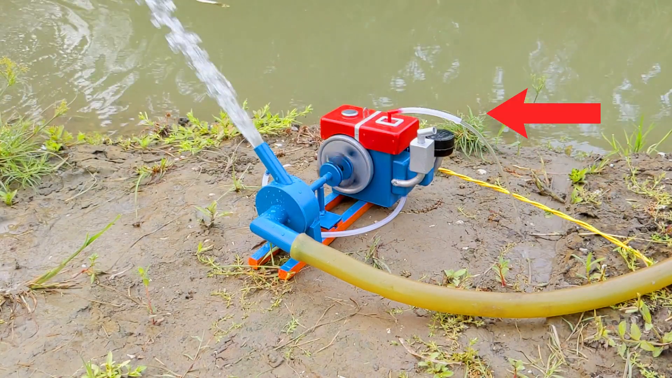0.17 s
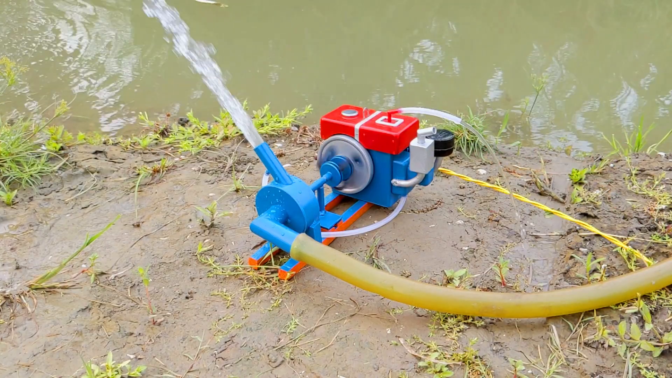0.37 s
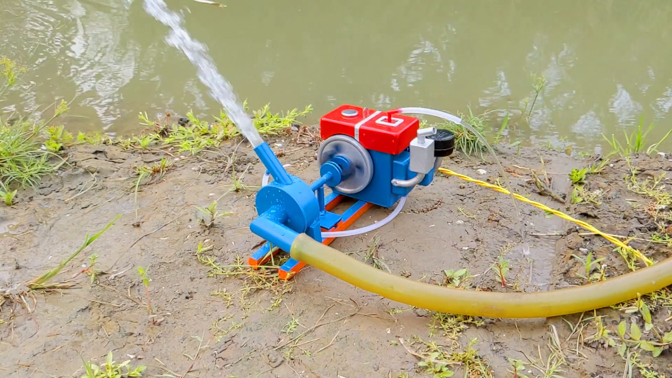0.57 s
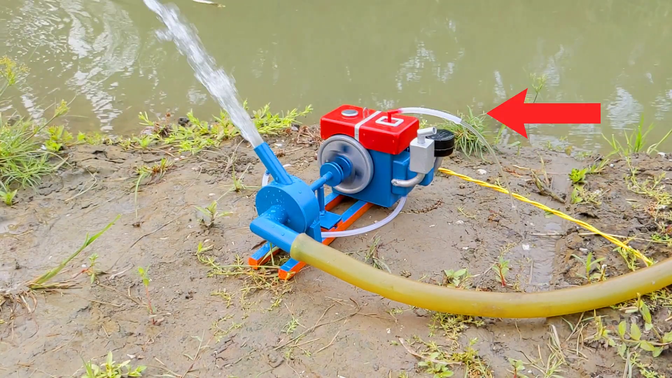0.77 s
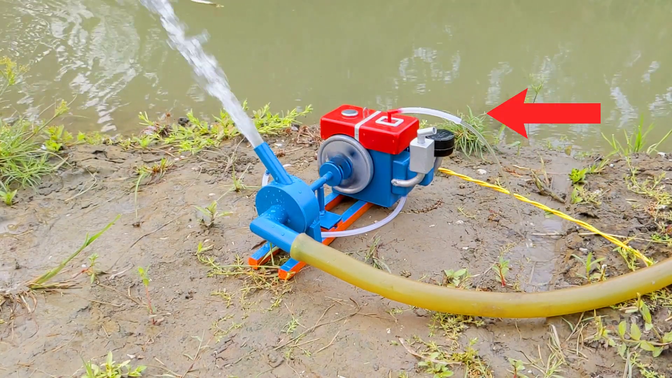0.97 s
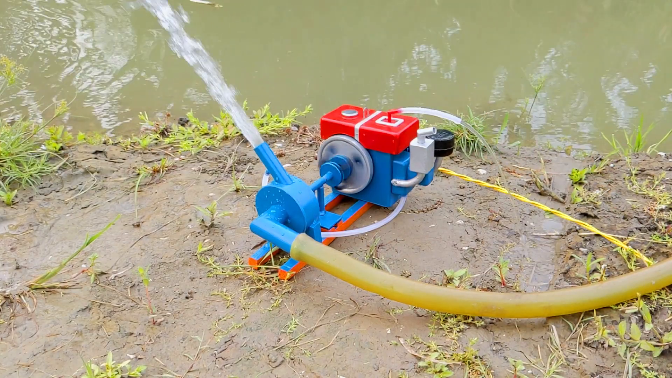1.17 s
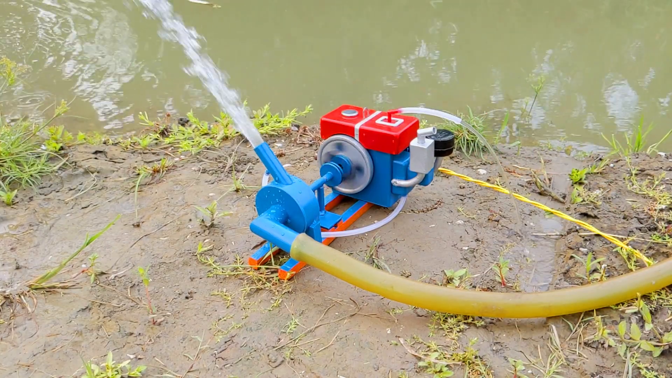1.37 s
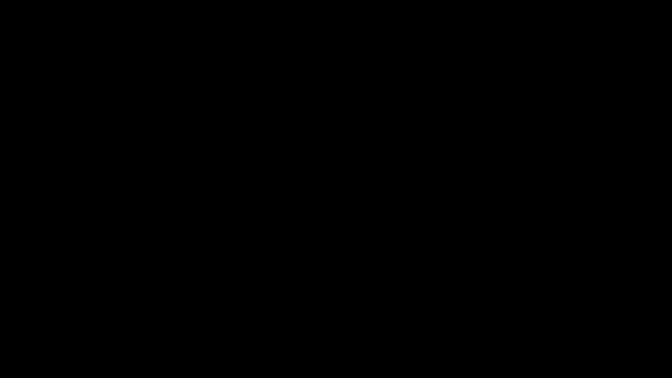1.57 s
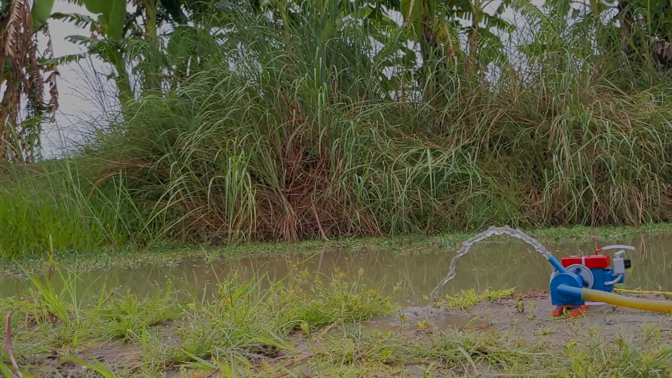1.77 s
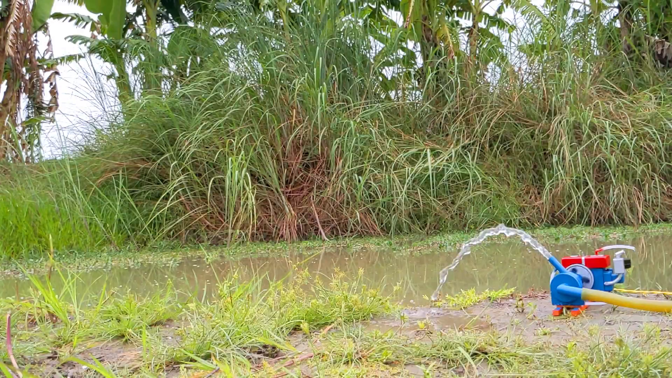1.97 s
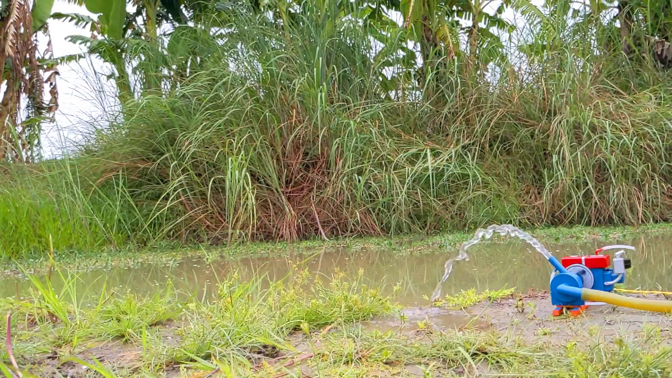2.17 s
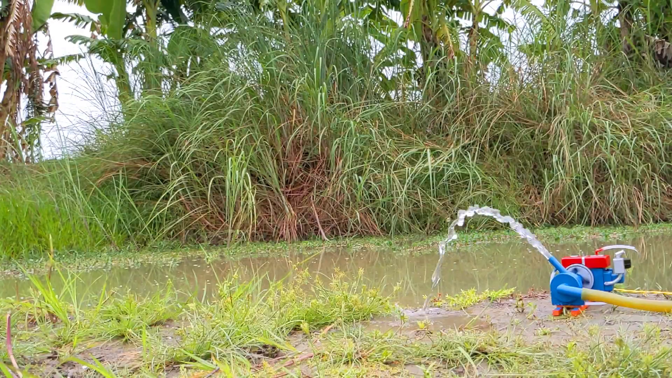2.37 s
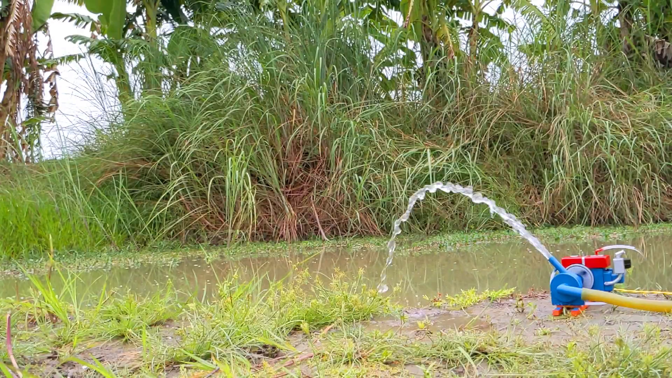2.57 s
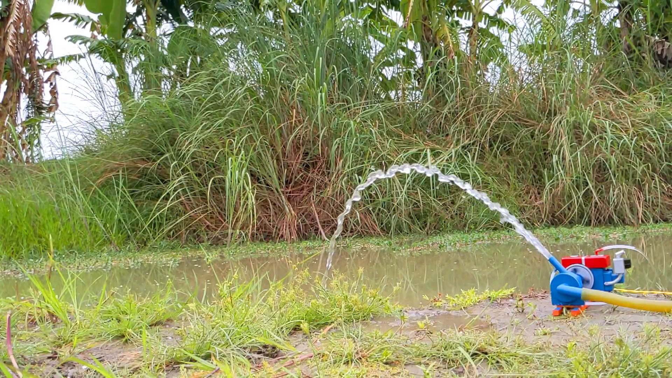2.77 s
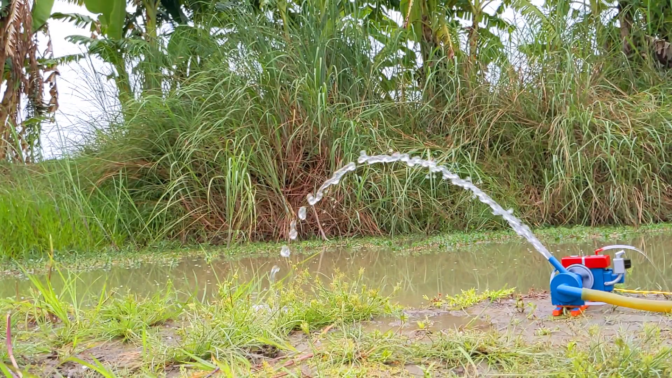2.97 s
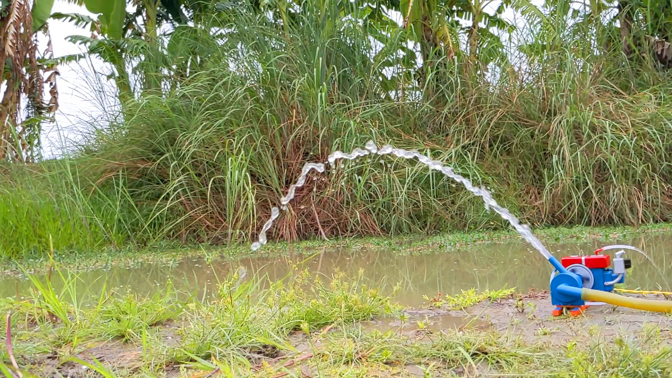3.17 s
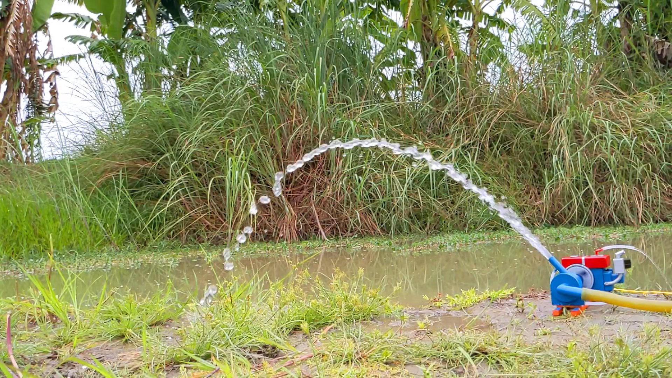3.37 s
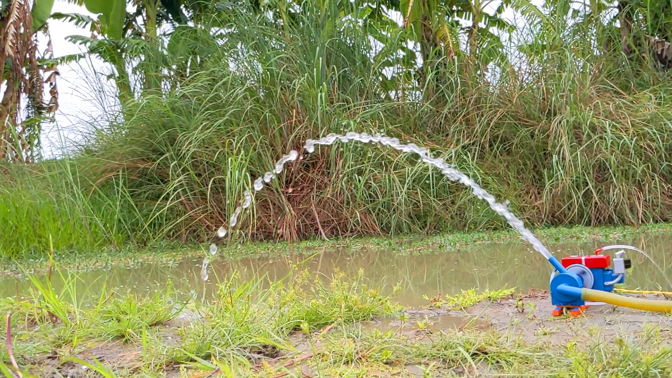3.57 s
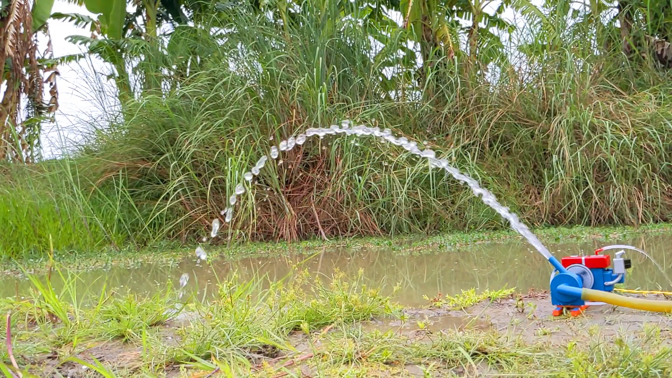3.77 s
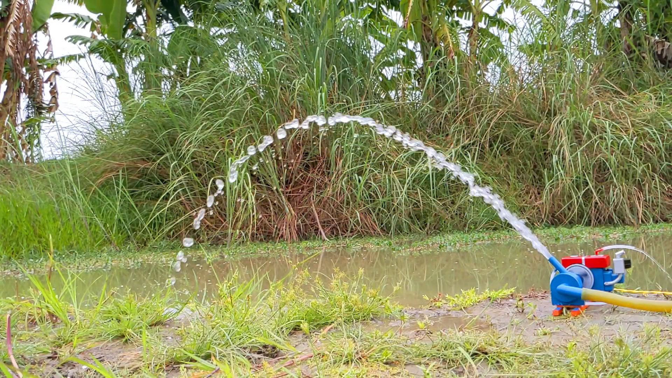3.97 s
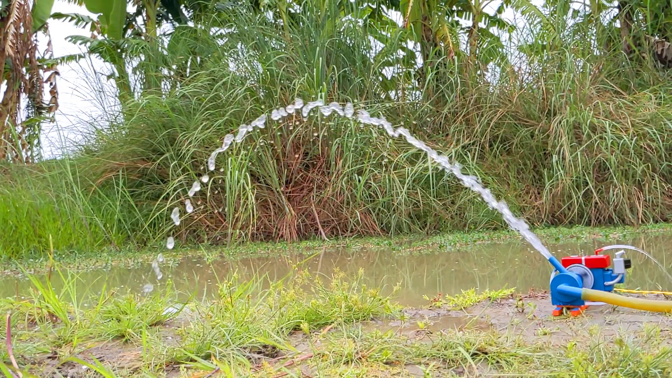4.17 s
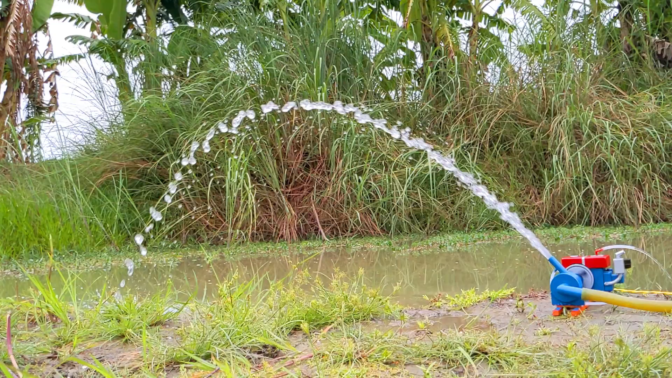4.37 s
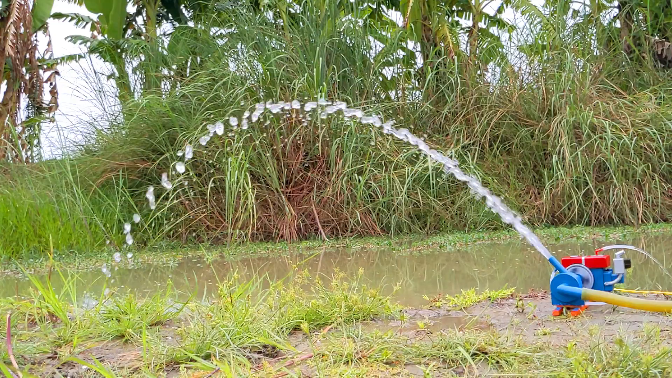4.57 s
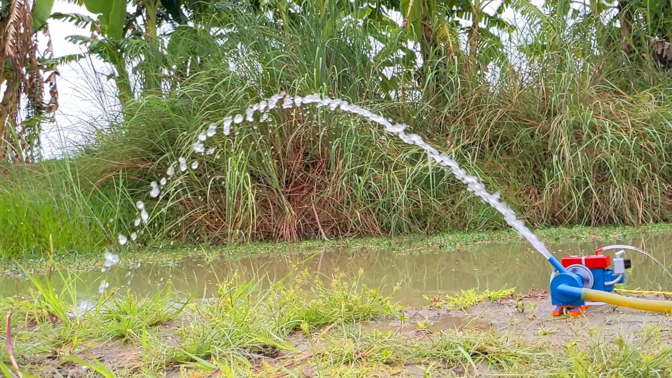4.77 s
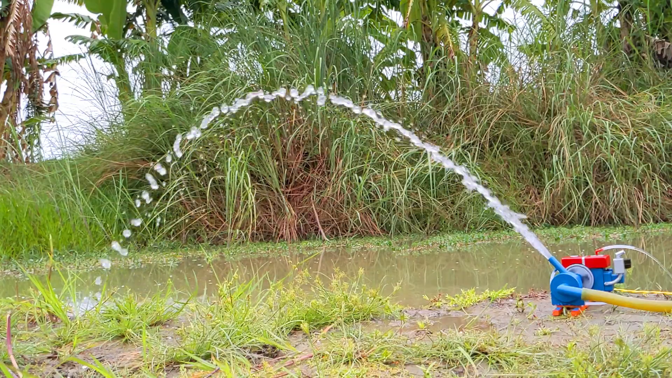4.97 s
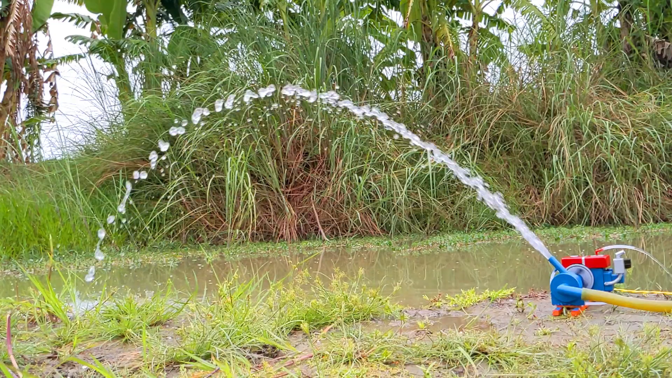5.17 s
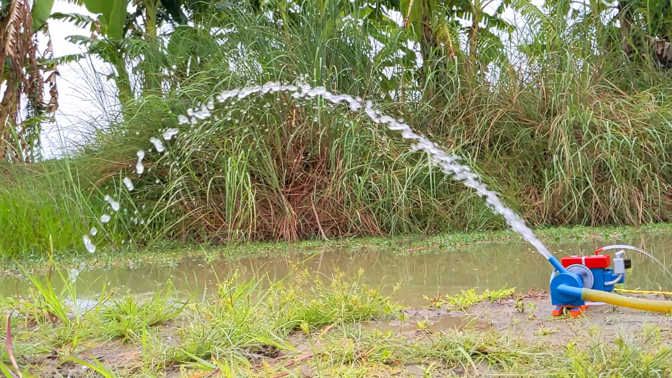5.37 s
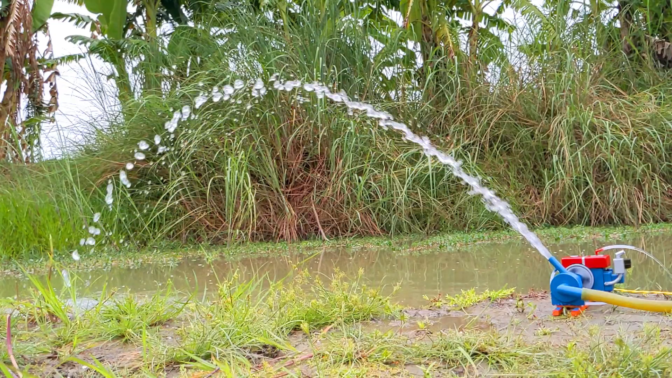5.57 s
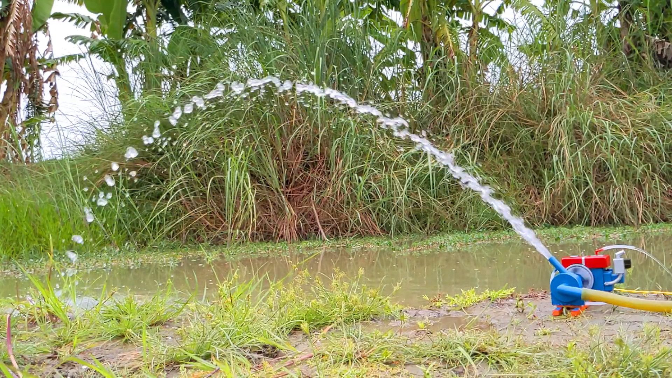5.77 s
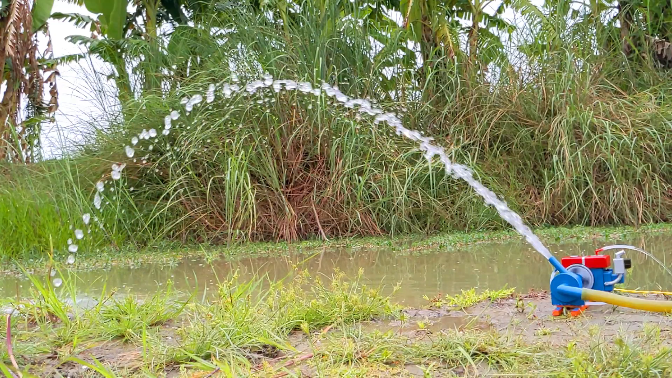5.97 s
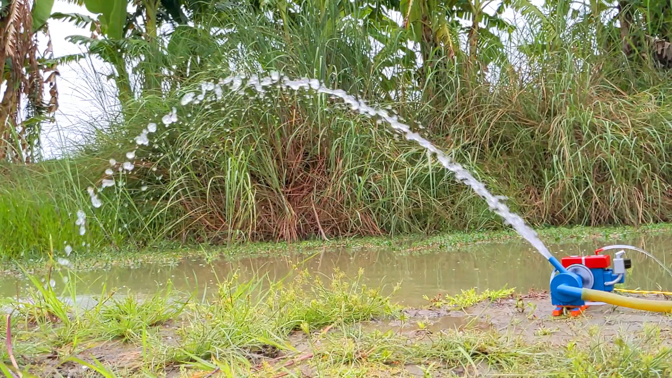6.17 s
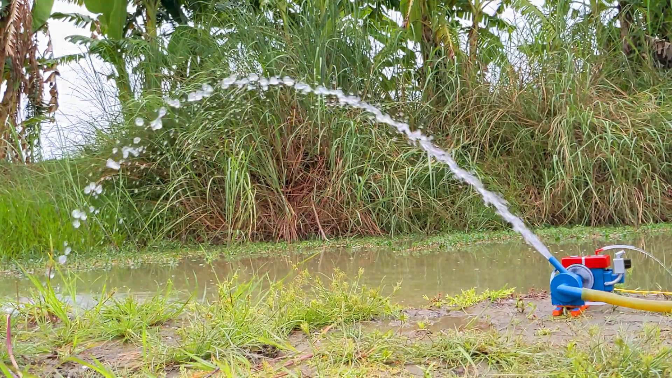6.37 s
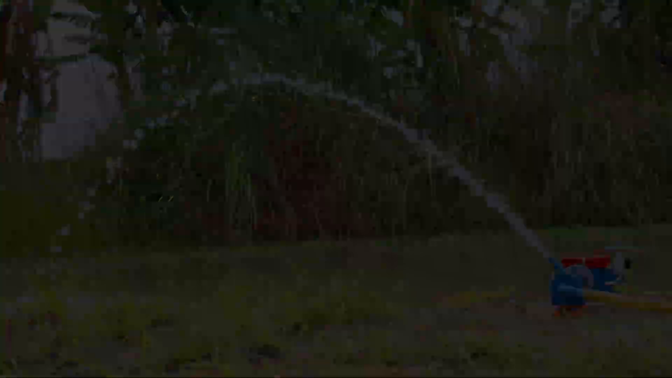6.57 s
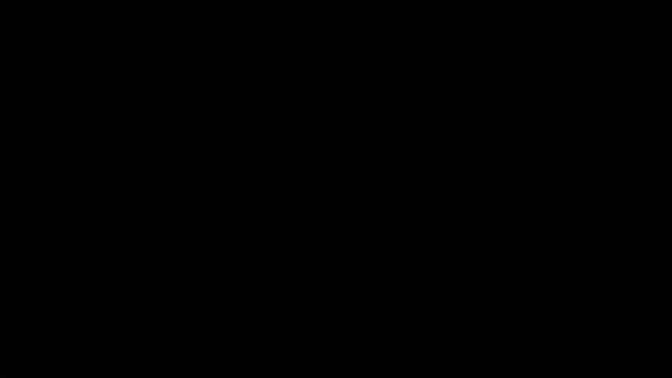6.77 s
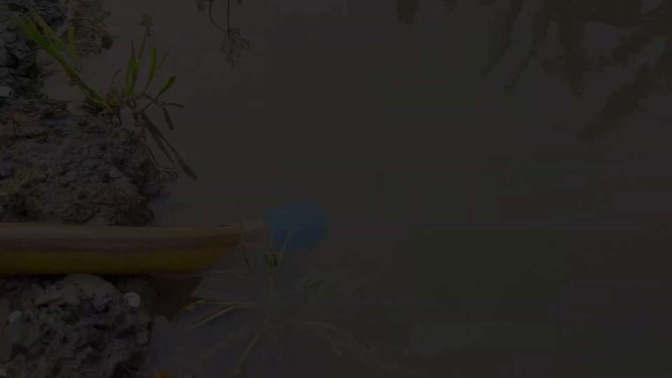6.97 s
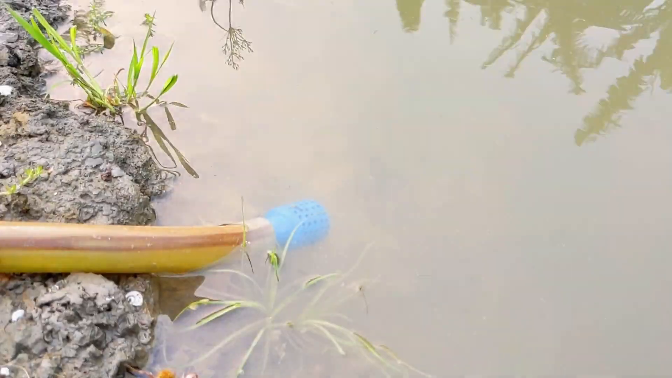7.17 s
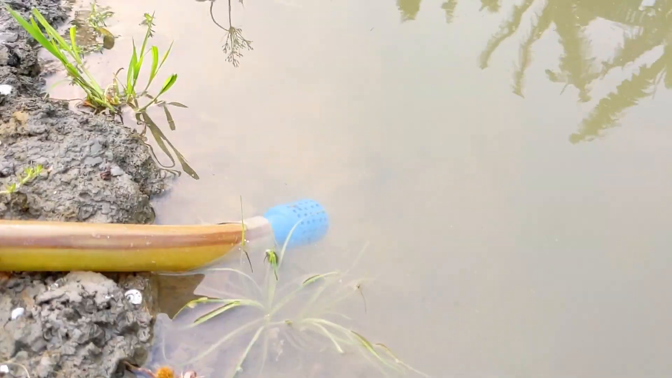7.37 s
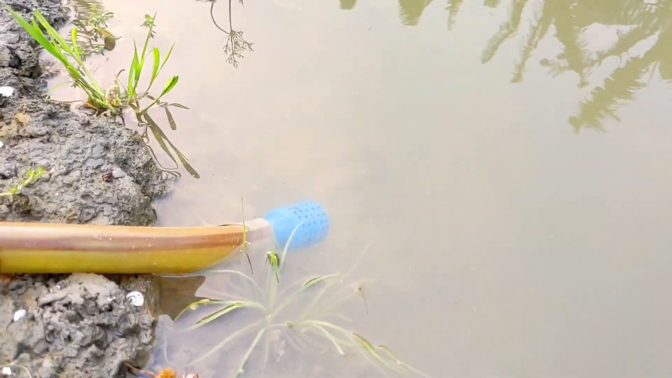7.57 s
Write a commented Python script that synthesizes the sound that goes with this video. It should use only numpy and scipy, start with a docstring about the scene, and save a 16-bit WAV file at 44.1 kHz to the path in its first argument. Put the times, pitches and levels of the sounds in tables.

```python
"""A toy pump beside a pond, heard from three places in turn that fade into one another.
Close by, shaft knocks and clacks ring modes of the plastic casing, with a hum and a thin whistle of sines.
Flickering noise bands make the jet's spray, low noise the wind and open air; hiss bursts make bright
pump clacks and, later, the jet's splats. Further off, the pump starts and spins up; short gliding tones
make pops, most of them drips, and later hollow plops. At the intake it runs steadily amid puffs of wind."""
import sys
import numpy as np
from scipy import signal
from scipy.io import wavfile
from scipy.ndimage import uniform_filter1d

SR = 44100
rng = np.random.default_rng(int(sys.argv[2]) if len(sys.argv) > 2 else 0)


def int16_out(signal):
    """Quantize to a 16-bit WAV file."""
    q = np.round(np.clip(np.atleast_2d(signal).T, -1, 1) * 32767)
    wavfile.write(sys.argv[1], SR, q.astype(np.int16))


N = 336042
TIME = np.arange(N) / SR
SIDES = np.array([[1], [-1]])  # left, right
# fade-in start, fade-in end, fade-out start, fade-out end, all in seconds
CLOSE_FADE = (-1, -.5, 1.51, 1.85)
FAR_FADE = (1.6, 1.9, 6.5, 7.2)
INTAKE_FADE = (6.72, 7.07, 8, 9)


def undb(db):
    """dB to gain."""
    return 10 ** (np.asarray(db) / 20)


def unit(x):
    """Scale to rms 1."""
    return x / np.sqrt(np.mean(x ** 2))


def pan(left_minus_right_db):
    """Left and right gains that split a level difference evenly."""
    return undb(left_minus_right_db * SIDES / 2)


def band(x, lo_hz, hi_hz, order=2):
    """Band-pass."""
    sos = signal.butter(order, [lo_hz, min(hi_hz, .45 * SR)], "band", fs=SR, output="sos")
    return signal.sosfilt(sos, x)


def walk(rate):
    """Random levels held 1 / rate s and slewed; spread near 1."""
    hold = int(SR / rate)
    steps = np.repeat(rng.standard_normal(N // hold + 1), hold)
    return 1.52 * uniform_filter1d(uniform_filter1d(steps, hold), hold)[:N]


def fade(times):
    """Gain of a place that fades in and out."""
    return np.interp(TIME, times, [0, 1, 1, 0]) ** 0.98


def mixed(levels_db):
    """One gain from the levels close, far and at the intake, summed as powers."""
    places = zip((CLOSE_FADE, FAR_FADE, INTAKE_FADE), levels_db)
    return np.sqrt(sum((fade(times) * undb(db)) ** 2 for times, db in places))


def clicks(times, sizes):
    """Impulses at exact times, each shared between two samples."""
    out, place = np.zeros(N + 1), np.clip(times * SR, 0, N - 1)
    whole = place.astype(int)
    np.add.at(out, whole, sizes * (1 - place + whole))
    np.add.at(out, whole + 1, sizes * (place - whole))
    return out[:N]


def add(out, start_s, sound):
    """Mix a short stereo sound in at a time."""
    i = int(start_s * SR)
    out[:, i:i + sound.shape[1]] += sound[:, :N - i]


def small(start_s, end_s, db, scatter_db, lo_hz, hi_hz, count):
    """Random rows of start in seconds, peak level in dB, frequency in Hz."""
    u = rng.random((count, 3))
    starts = start_s + (end_s - start_s) * u[:, 0]
    levels = db + scatter_db * (2 * u[:, 1] - 1)
    return list(zip(starts, levels, lo_hz * (hi_hz / lo_hz) ** u[:, 2]))


def bubble(t, hz, cycles, glide, order=1):
    """A rising tone whose envelope swells to 1 and dies within a few cycles."""
    u = t * hz / cycles
    return (u * np.exp(1 - u)) ** order * np.sin(2 * np.pi * hz * t * (1 + glide * t))


def blows(speed, rates, db, angles, strengths, scatter_db, jitter_ms, lag_ms):
    """Clicks at set angles of every shaft turn, uneven in size and time; the left is shifted by the lag."""
    running = TIME >= speed[0][0]
    # the small ramp keeps the turn count rising while the shaft rests
    turns = np.cumsum(np.interp(TIME, *np.transpose(speed)) * running) / SR + TIME / N
    whole = np.arange(int(np.interp(speed[-1][0] + .2, TIME, turns)))
    rate = np.interp(np.interp(whole + .5, turns, TIME), *np.transpose(speed))
    angles, strengths = np.array(angles).T, np.array(strengths).T
    at = np.interp([whole + np.interp(rate, angles[0], a) for a in angles[1:]], turns, TIME)
    share = undb([np.interp(rate, strengths[0], c) for c in strengths[1:]])
    # the blows of one turn share the power of that moment
    share = share / np.sqrt(np.sum(share ** 2, 0) * rate / SR)
    chance = rng.standard_normal((2, *at.shape))
    size = share * undb(np.interp(rate, rates, db) + scatter_db * chance[0])
    # the shaft also slips a little as a whole from turn to turn
    times = at + jitter_ms * (chance[1] + chance[1, 0]) / 1000
    return np.array([clicks(times + lag_ms / 1000, size), clicks(times, size)])


def rattled(hits, share, fade_s, wide):
    """Part of each blow's power turns into a few ms of chatter from loose parts, unlike on the two sides."""
    keep = np.exp(-1 / (fade_s * SR))
    noise = unit(rng.standard_normal(N) + wide * rng.standard_normal((2, N)))
    tail = signal.lfilter([np.sqrt(1 - keep ** 2)], [1, -keep], hits)
    return np.sqrt(1 - share) * hits + np.sqrt(share) * noise * tail


def ring(x, modes, place):
    """Decaying modes that start together; a unit click comes out with unit energy."""
    t = np.arange(SR // 8) / SR
    shape = 0
    for mode in modes:
        hz, t60_s, gain = mode[0], mode[1], undb(mode[2 + place])
        shape = shape + gain * np.exp(-np.log(1000) * t / t60_s) * np.sin(2 * np.pi * hz * t)
    return signal.oaconvolve(x, -shape[None] / np.sqrt(np.sum(shape ** 2)), axes=1)[:, :N]


# Casing modes, dull ones for the knocks and bright ones for the clacks.
# Each row: frequency in Hz, 60 dB decay time in seconds, relative level in dB close, far and at the intake.
BOOM_MODES = [(438, 0.035, -34, -15, -6), (545.3, 0.065, -42, -8, -1), (617, 0.041, -48, -17, -20),
              (769, 0.059, -3.5, -7, -13), (800.7, 0.068, 3.5, 3, -3), (840.5, 0.036, 1.5, 6.5, 12.5),
              (945, 0.0083, -36, -0.5, 15)]
CLACK_MODES = [(1233, 0.03, -12, 5, -29), (1590, 0.0082, -29, 14.5, -41), (2113, 0.0058, -3, 14, 15.5),
               (2654, 0.015, -44, 6.5, -25), (3647, 0.0046, 13.5, -32, -32), (4650, 0.0035, 9, -2, 0),
               (6040, 0.0028, 3.5, 7, 3.5), (7970, 0.0024, -7, -31, 6), (12500, 0.001, 3, -3, -20)]
REBOUND_MS, REBOUND_DB = 1.193, -4  # each clack bounces once


def pump(speed, level, knocks, clacks, place, scatter_db, jitter_ms, rattle, boom_lag_ms, clack_lag_ms):
    """Dull knocks boom in the casing; sharp clacks bounce once and ring its small parts."""
    rates, boom_db, clack_db = np.transpose(level)
    boom = blows(speed, rates, boom_db, *knocks, scatter_db, jitter_ms, boom_lag_ms)
    boom = rattled(boom, rattle, fade_s=.005, wide=.5)
    # clacks vary more in level and have a timing scatter of their own
    clack = blows(speed, rates, clack_db, *clacks, scatter_db + 1.2, .04, clack_lag_ms)
    clack = clack + undb(REBOUND_DB) * np.roll(clack, int(REBOUND_MS * SR / 1000), axis=1)
    clack = rattled(clack, .15, fade_s=.002, wide=.7)
    # so small a casing sends out no bass
    boom = band(ring(boom, BOOM_MODES, place), 490, 1180)
    return boom + band(ring(clack, CLACK_MODES, place), 1000, 18000)


# Close shaft speed. Each row: time in seconds, turns per second.
CLOSE_SPEED = [(0, 34.57), (1.8, 34.57)]
# Close loudness. Each row: shaft speed in turns per second, boom level in dB, clack level in dB.
CLOSE_LEVEL = [(34.57, -29.5, -37)]
# Where knocks and clacks fall. Each row: turns per second, then an angle in turns for each blow.
CLOSE_KNOCK_ANGLES = [(34.57, .414, .58, .599, .716, .829)]
CLOSE_CLACK_ANGLES = [(34.57, .435, .61, .76)]
# How hard they strike. Each row: turns per second, then a relative strength in dB for each blow.
CLOSE_KNOCKS = [(34.57, -16.5, -0.091, -0.2, -4, 2.5)]
CLOSE_CLACKS = [(34.57, -5.5, 0, -0.5)]


def close_pump():
    """The nearby shaft turns steadily and strikes the casing several times a turn."""
    return pump(CLOSE_SPEED, CLOSE_LEVEL, (CLOSE_KNOCK_ANGLES, CLOSE_KNOCKS),
                (CLOSE_CLACK_ANGLES, CLOSE_CLACKS), place=0,
                scatter_db=.6, jitter_ms=.02, rattle=.03, boom_lag_ms=-.06, clack_lag_ms=.1)


WHISTLE_HZ, WHISTLE_DB = 5157, -14  # level against the close clack


def whistle():
    """A thin high sine that wavers in level and slightly in pitch."""
    db = CLOSE_LEVEL[0][2] + WHISTLE_DB + 1.6 * walk(14)
    return undb(db) * np.sin(2 * np.pi * np.cumsum(WHISTLE_HZ + 1.5 * walk(20)) / SR)


# Motor hum close and at the intake. Each row: multiple of the shaft speed, rms level in dB.
CLOSE_HUM = [(7, -58), (11, -54), (12, -62), (13, -61), (14, -62), (16, -51), (17, -54), (18, -54)]
INTAKE_HUM = [(7.3, -54.5), (9, -51), (12, -48), (13, -55)]


def hum(orders, speed):
    """Low motor tones at fixed multiples of a steady shaft speed that waver a little in level."""
    out = 0
    for order, db in orders:
        gain = np.sqrt(2) * undb(db + 0.44 * walk(15))
        out = out + gain * np.sin(2 * np.pi * (order * speed[0][1] * TIME + rng.random()))
    return out


BURST_LAG_S = .0002  # the left side hears droplets and hiss bursts a little late
BURST_PAN_DB = -6.5  # left minus right, for both


def droplets(count):
    """Tiny bubbles of a few cycles, each on its own pitch."""
    out, t = np.zeros((2, N)), np.arange(SR // 100) / SR
    lagged = np.maximum(t - np.array([[BURST_LAG_S], [0]]), 0)
    lo_hz, hi_hz = 1600, 6000
    for when, strength, pitch, side in rng.random((count, 4)):
        # the weakest lie near 2 dB before the patter depth and spray level scale them
        size = undb(2 - 3.4 * np.log(strength + 0.066)) * pan(BURST_PAN_DB + 8 * (side - .5))
        add(out, when * N / SR, size * bubble(lagged, lo_hz * (hi_hz / lo_hz) ** pitch, 2.2, glide=21.4))
    return out


def patter():
    """Many small drops as short decaying pulses that land left and right."""
    when, strength, side = rng.random((2400, 3)).T
    size = undb(-5.3 * np.log(strength + .008))
    decay = np.exp(-1 / (.0015 * SR))
    bursts = np.array([clicks(when * N / SR, size * w) for w in (np.sqrt(side), np.sqrt(1 - side))])
    return unit(signal.lfilter([1], [1, -decay], bursts))


# Colour of the spray. Each row: frequency in Hz, relative level in dB per Hz.
SPRAY_COLOUR = [(150, -22), (260, -22), (450, -31), (620, -28), (800, -15), (1300, -32), (2000, -28.5),
                (3200, -29.5), (4840, -37), (8000, -38.5), (15500, -53)]
SPRAY_DB = (-44, -43.5, -43)  # close, far at full speed, at the intake
SPRAY_DB_PER_TURN_S = 1.02  # the far jet grows with shaft speed
SPRAY_DULL_DB = 0.06  # treble lost per octave above 4 kHz for each turn per second below full speed
PATTER_DB = (-1, 3, -1)  # depth of the patter close, far and at the intake
TREBLE_PAN_DB = -4  # left minus right; the right microphone hears more of the spray's top


def water():
    """Spray as half-octave noise bands that flicker, pricked by the patter and ringing droplets."""
    slower = FAR_SPEED[-1][1] - np.interp(TIME, *np.transpose(FAR_SPEED))
    gain = mixed((SPRAY_DB[0], SPRAY_DB[1] - SPRAY_DB_PER_TURN_S * slower, SPRAY_DB[2]))
    depth = mixed(PATTER_DB) / mixed((0, 0, 0))
    drops = patter()
    colour_hz, colour_db = np.transpose(SPRAY_COLOUR)
    out, swell = 0, walk(11)
    for hz in 150 * 2 ** np.arange(0, 7, .5):
        db = np.interp(np.log(hz), np.log(colour_hz), colour_db) + 1.5 * swell + 1.6 * walk(12)
        db = db - SPRAY_DULL_DB * max(np.log2(hz / 4000), 0) * slower * fade(FAR_FADE)
        mid, side = rng.standard_normal((2, N))
        # low sound is nearly alike at both microphones; drops show mostly in the treble
        wide = min(hz / 1300., 1.05)
        # each band has drops of its own besides those that sound in all
        pricks = .45 * drops + .75 * np.roll(drops, rng.integers(N), axis=1)
        noise = (mid + wide * side * SIDES) * (1 + wide ** 2 * depth * pricks)
        treble_pan = pan(TREBLE_PAN_DB * np.exp(-np.log2(hz / 9600) ** 2 * 4))
        out = out + undb(db) * treble_pan * band(noise, hz * 2 ** -.25, hz * 2 ** 0.24)
    # bring the treble to rms 1, then lean the whole spray to the right
    out = out / np.sqrt(np.mean(band(out, 4500, 14000) ** 2)) * pan(-3)
    return (out + depth * droplets(count=2200)) * gain


# Puffs of wind on the ports.
# Each row: middle in seconds, level in dB, half length in seconds (to 1/e), left minus right in dB.
GUSTS = [(0.01, -50, 0.021, -18), (.17, -60, 0.093, -6), (0.833, -50, 0.022, 18), (0.957, -42, 0.075, -1),
         (1.106, -49, 0.035, 18), (1.225, -51, 0.042, -9), (6.894, -52, 0.052, 6),
         (7.037, -40.5, 0.055, 13), (7.207, -54, 0.092, 20), (7.36, -53.5, 0.07, 25),
         (7.51, -53, 0.043, 14)]
BREEZE_DB = (-57.5, -51, -56.5)  # steady rumble close, far and at the intake
BREEZE_ALIKE = .75  # likeness of the two sides, 0-1


def wind():
    """Low rumble of air on the microphone ports: a steady breeze and short puffs, many to one side."""
    rumbles = []
    for noise in rng.standard_normal((4, N)):
        rumbles.append(unit(band(noise, 48.0, 109.4, order=3) + undb(-10.0) * band(noise, 119, 304)))
    mid, side, puff_mid, puff_side = rumbles
    breeze = np.sqrt(1 + BREEZE_ALIKE) * mid + np.sqrt(1 - BREEZE_ALIKE) * side * SIDES
    gusts = 0
    for middle_s, db, half_s, pan_db in GUSTS:
        gusts = gusts + undb(db) * pan(pan_db) * np.exp(-((TIME - middle_s) / half_s) ** 2)
    return breeze * mixed(BREEZE_DB) + gusts * unit(puff_mid + .8 * SIDES * puff_side)


def air():
    """A soft wide bed of outdoor noise, partly alike on both sides, that wavers slowly."""
    noise = rng.standard_normal(N) + 0.3 * rng.standard_normal((2, N))
    return unit(band(noise, 150, 1460, order=1)) * undb(-54.5 + 1.4 * walk(2.82))


# Short bursts of hiss: clacks of the pump early on, then splats of water.
# Each row: start in seconds, peak of the hiss in dB before crack and pan, brightness in Hz.
HISS_BURSTS = [(.0747, -39, 8060), (0.1375, -28, 7800), (.2648, -32, 8000), (.3102, -28.5, 8000),
               (.3326, -28, 8000), (.3681, -31, 8000), (.5636, -33, 12000), (.583, -33, 9000),
               (.600, -24, 5200), (.633, -35, 9500), (.6938, -34, 7400), (0.766, -31, 8000),
               (.8175, -27.5, 8000), (.8525, -33, 8000), (.9148, -28, 8050), (.9622, -29, 8000),
               (1.058, -26.5, 7960), (1.385, -22, 3000), (1.832, -39, 5500), (1.947, -39, 4500),
               (2.011, -33, 2000), (2.02, -27, 2530), (2.0324, -32, 4100), (2.18, -30, 2680),
               (2.255, -38, 8000), (2.325, -28.5, 5530), (2.369, -29, 6050), (2.479, -20.5, 3330),
               (2.563, -27.5, 5200), (2.628, -33.5, 5340), (2.658, -32, 4220), (2.607, -28, 2090),
               (2.687, -22.5, 2300), (2.740, -26, 1800), (2.755, -28, 2300), (3.039, -30, 1500),
               (3.059, -26, 1300), (3.087, -26, 2200), (3.13, -31, 1700), (3.15, -22, 2660),
               (3.183, -33, 6000), (3.200, -34, 5900), (3.210, -25, 2100), (3.2324, -20, 2740),
               (3.4263, -22.5, 1520), (3.576, -22, 2980), (3.631, -28, 6200), (3.688, -24, 1150),
               (3.719, -18.5, 1960), (3.727, -28, 2400), (3.747, -24, 5300), (3.8746, -29, 5010),
               (4.16, -28, 4940), (4.248, -25, 1530), (4.2788, -25, 5170), (4.34, -25.5, 5600),
               (4.411, -23, 4550), (4.463, -30, 4810), (4.5356, -26, 3150), (4.565, -22.5, 5600),
               (4.8464, -27, 4500), (4.861, -27.5, 5500), (4.942, -27, 5500), (4.993, -34, 6000),
               (5.069, -23, 4280), (5.1362, -29, 5000), (5.153, -20.5, 2490), (5.2463, -26.5, 3380),
               (5.554, -31, 3030), (5.6311, -40, 4720), (5.6594, -21, 3070), (5.7595, -22, 3310),
               (5.8226, -19, 3500), (5.8766, -23.5, 3370), (5.911, -28, 3920), (5.995, -28, 3600),
               (6.0442, -39, 4400), (6.215, -27.5, 7950), (6.2789, -14.5, 4570), (6.337, -24, 4460),
               (6.3836, -26, 3780), (6.424, -21.5, 3280), (6.4496, -26, 2220), (6.4937, -32, 3280),
               (6.541, -21.5, 3660), (6.6203, -28, 4700), (6.655, -20, 3250), (6.728, -18.5, 3300),
               (7.1936, -30, 4500), (7.235, -25.5, 6540), (7.432, -23, 4540), (7.48, -29, 5000),
               (7.5478, -27, 5840)]
CRACK_DB, FIZZ_DB = -14, -8  # bright edge against the hiss peak; fizz after it against the edge


def hiss_bursts():
    """Short bursts of hiss with a bright crack and fizz: pump clacks, then water splats."""
    out, t = np.zeros((2, N)), np.arange(SR // 20) / SR
    small_splats = small(3.4, 6.75, db=-29.5, scatter_db=4, lo_hz=1200, hi_hz=4500, count=70)
    for start_s, db, hz in HISS_BURSTS + small_splats:
        noise = rng.standard_normal(len(t)) + .5 * rng.standard_normal((2, len(t)))
        hiss = band(noise, hz * .8, hz * 1.3)
        hiss[0] = np.roll(hiss[0], int(BURST_LAG_S * SR))
        burst = hiss * np.exp(-t / 0.0046) * np.minimum(t / 0.00043, 1)
        edge = np.exp(-t / 0.00026) + undb(FIZZ_DB) * np.exp(-t / 0.0053)
        crack = undb(CRACK_DB) * unit(band(noise, 4500, 12000, order=1)) * edge
        add(out, start_s, undb(db) * pan(BURST_PAN_DB) * (burst / np.abs(burst).max() + crack))
    return out


# Single short pops. Each row: start in seconds, peak level in dB before pan, pitch in Hz, left minus right in dB.
POPS = [(1.768, -36, 2000, 0), (1.8546, -30, 3500, 0), (2.011, -32.5, 860, 1), (2.065, -41, 5260, 0),
        (2.085, -44, 4600, 0), (2.107, -40, 4400, 0), (2.180, -37, 7300, -11), (2.189, -37, 1290, 0),
        (2.212, -39, 6050, -5), (2.335, -28, 4000, 0), (4.2483, -22, 1480, 2), (4.609, -25, 1330, 0),
        (6.280, -25, 4830, 0), (6.658, -24, 3300, -8), (6.728, -24, 1490, 0), (7.1678, -7.5, 2130, -3)]
POP_LAG_S = .0001  # the left side hears them a little late


def pops():
    """Short pops that glide up, most of them drips."""
    out, t = np.zeros((2, N)), np.arange(SR // 20) / SR
    lagged = np.maximum(t - np.array([[POP_LAG_S], [0]]), 0)
    for start_s, db, hz, pan_db in POPS:
        pop = bubble(lagged, hz, cycles=2.7, glide=4.2, order=3)
        add(out, start_s, undb(db) * pan(pan_db) * pop)
    return out


# Far shaft speed as it spins up. Each row: time in seconds, turns per second.
FAR_SPEED = [(2.2, 23.56), (2.32, 23.75), (2.53, 28.57), (2.88, 31.49), (3.18, 32.88), (3.45, 34.45),
             (3.72, 35.6), (3.9, 37.5), (4.07, 38.39), (4.46, 38.39), (4.63, 39.74), (4.97, 40.23),
             (5.29, 41.09), (5.6, 41.2), (5.9, 41.7), (6.9, 41.8)]
# Far loudness. Each row: shaft speed in turns per second, boom level in dB, clack level in dB.
FAR_LEVEL = [(24.2, -42, -44), (28.9, -36, -41.5), (32.03, -30, -39), (33, -27.5, -34.5),
             (33.6, -29.5, -37.5), (35.3, -28, -34), (36.7, -24.5, -33), (38.25, -27, -33.5),
             (40.4, -26, -35), (42, -26, -39), (41.8, -17.5, -34)]
# Where knocks and clacks fall. Each row: turns per second, then an angle in turns for each blow.
FAR_KNOCK_ANGLES = [(26.2, .166, .195, .272, .439, .657, .91), (41.7, .159, .205, .309, .494, .645, .935)]
FAR_CLACK_ANGLES = [(38, .158, .482, .828), (41.7, .158, .515, .83)]
# How hard they strike; the load moves round the turn with speed.
# Each row: turns per second, then a relative strength in dB for each blow.
FAR_KNOCKS = [(28.3, 6.5, -47, -11, -14, -9, -5), (31.56, 0, 6, 6, 1, -18, -3),
              (32.9, -4, -1, 0, -8, -9, 0.5), (33.85, -8, -2, -7, -3, -9, 2),
              (34.9, -8, -4, 1, -10, -8, 2.5), (35.6, 6, -46, -3, -45, -10, 5.5),
              (37, -41, -33, -14, -12, -22.5, -8), (37.95, -38, -33, -15, -12.5, -20, -8),
              (38.4, -21, -42, -20, -12.5, -14.5, -14.5), (40.1, 3.5, -42, 2, 2.5, -2.5, 5.5),
              (41.5, 1.5, -15, -11, 3, -5.5, 3.5), (41.8, -8, -1.5, -3.5, 0, -0.5, -1)]
FAR_CLACKS = [(29, 12, -28, -33), (31.2, 0, -12, -3), (32.8, 1, -3, -2), (33.9, -3, -7, 2),
              (36.4, -2, -7, -4), (38.7, -14, -15, -15.5), (41.7, -14.5, -1.5, -0.5)]


def far_pump():
    """The shaft starts and spins up, and its knocks and clacks shift in angle, balance and level with speed."""
    out = pump(FAR_SPEED, FAR_LEVEL, (FAR_KNOCK_ANGLES, FAR_KNOCKS),
               (FAR_CLACK_ANGLES, FAR_CLACKS), place=1,
               scatter_db=.7, jitter_ms=.015, rattle=.03, boom_lag_ms=-.1, clack_lag_ms=.23)
    return out * np.clip((TIME - FAR_SPEED[0][0]) / 0.023, 0, 1)  # 23 ms ramp at the start


# The loudest hollow plops in puddles. Each row: start in seconds, peak of the tone in dB, pitch in Hz.
PLOPS = [(3.635, -34, 215), (3.782, -24.5, 344), (3.851, -25, 450), (3.977, -27.5, 270), (4.103, -29, 357),
         (4.157, -29.5, 412), (4.232, -30, 326), (4.258, -33, 240), (4.361, -26.5, 408), (4.827, -26, 443),
         (5.039, -25, 290), (5.131, -31, 345), (5.245, -27, 293), (5.274, -29.5, 396), (5.354, -34, 378),
         (5.417, -26, 384), (5.661, -35, 415), (6.043, -36, 290), (6.092, -33, 474), (6.256, -37, 250),
         (6.294, -35.5, 279), (6.391, -32, 427), (6.444, -30, 328), (6.63, -34.5, 173), (6.866, -36.5, 224),
         (7.199, -40, 237)]
PLOP_SPLASH_DB = -5  # wet noise round each plop


def plops():
    """Hollow low bubbles that glide up, each wrapped in wet noise."""
    out, t = np.zeros((2, N)), np.arange(SR // 20) / SR
    small_plops = small(3.5, 6.7, db=-40, scatter_db=5, lo_hz=170, hi_hz=560, count=60)
    for start_s, db, hz in PLOPS + small_plops:
        wet = unit(band(rng.standard_normal(len(t)), hz * .7, hz * 3.7))
        splash = wet * np.exp(-t / 0.018) * np.minimum(t / 0.005, 1)
        plop = bubble(t, hz, cycles=1.32, glide=4.5) + undb(PLOP_SPLASH_DB) * splash
        add(out, start_s, np.ones((2, 1)) * undb(db) * plop)
    return out


# Intake shaft speed. Each row: time in seconds, turns per second.
INTAKE_SPEED = [(6.7, 39.05), (7.62, 39.05)]
# Intake loudness. Each row: shaft speed in turns per second, boom level in dB, clack level in dB.
INTAKE_LEVEL = [(39.05, -32.5, -35)]
# Where knocks and clacks fall. Each row: turns per second, then an angle in turns for each blow.
INTAKE_KNOCK_ANGLES = [(39.05, .108, .381, .485, .629, .985)]
INTAKE_CLACK_ANGLES = [(39.05, .14, .315, .635, .965)]
# How hard they strike. Each row: turns per second, then a relative strength in dB for each blow.
INTAKE_KNOCKS = [(39.05, 9.9, 0, 4.7, 4.1, 1)]
INTAKE_CLACKS = [(39.05, -5.5, 0, -9, 0)]


def intake_pump():
    """The shaft turns steadily and strikes the casing, with the balance of modes heard at the intake."""
    return pump(INTAKE_SPEED, INTAKE_LEVEL, (INTAKE_KNOCK_ANGLES, INTAKE_KNOCKS),
                (INTAKE_CLACK_ANGLES, INTAKE_CLACKS), place=2,
                scatter_db=.6, jitter_ms=.015, rattle=.02, boom_lag_ms=.42, clack_lag_ms=.3)


def scene():
    """The three places follow one another over water and wind."""
    close = (close_pump() + whistle() + hum(CLOSE_HUM, CLOSE_SPEED)) * fade(CLOSE_FADE)
    far = far_pump() * fade(FAR_FADE)
    intake = (intake_pump() + hum(INTAKE_HUM, INTAKE_SPEED)) * fade(INTAKE_FADE)
    accents = hiss_bursts() + pops() + plops()
    return close + far + intake + water() + accents + wind() + air()


def record(dry):
    """The recorder cuts the top above 15950 Hz with a steep low-pass."""
    return signal.sosfilt(signal.ellip(10, .2, 80, 15950, fs=SR, output="sos"), dry)


dry = scene()
out = record(dry)
int16_out(out)
```